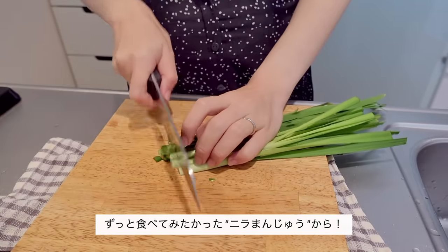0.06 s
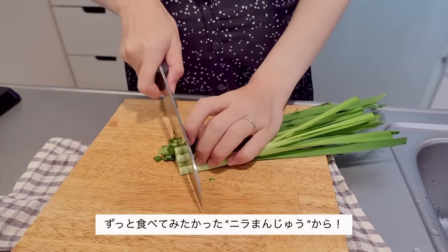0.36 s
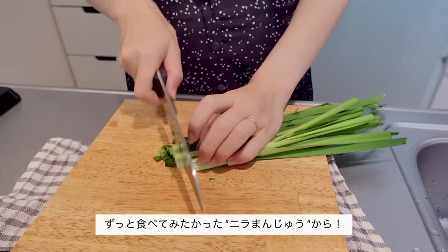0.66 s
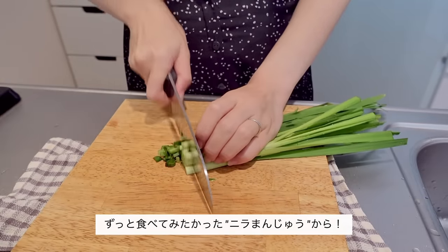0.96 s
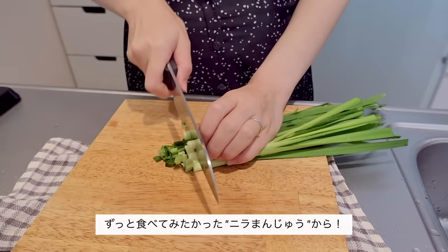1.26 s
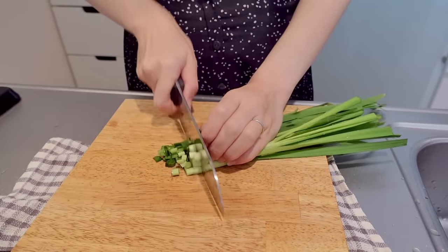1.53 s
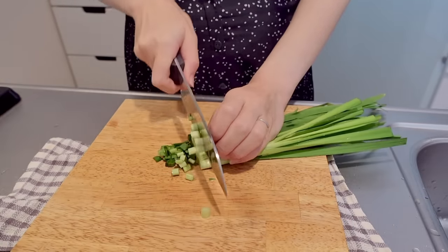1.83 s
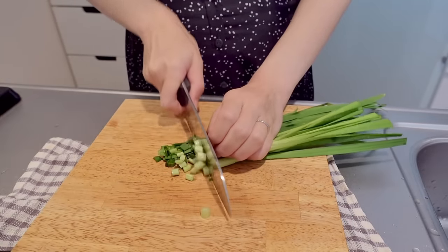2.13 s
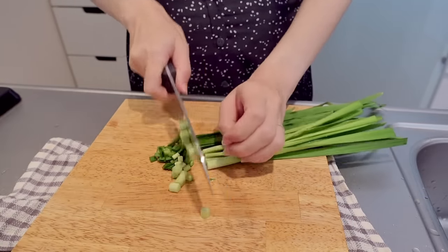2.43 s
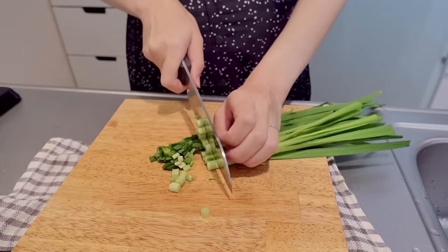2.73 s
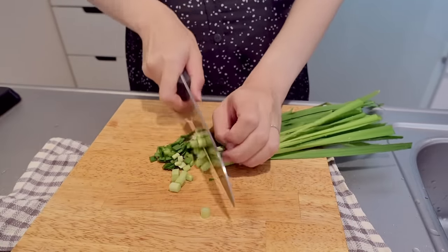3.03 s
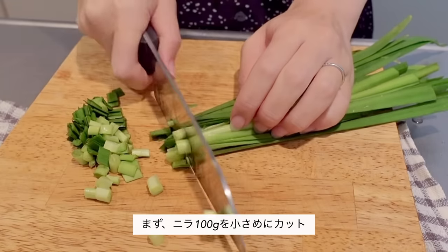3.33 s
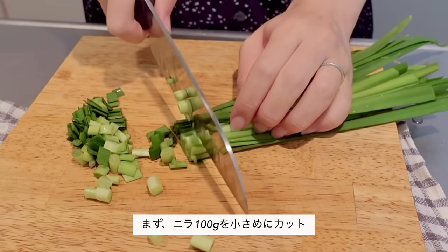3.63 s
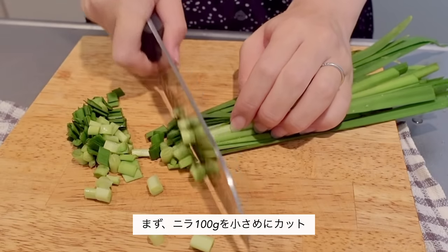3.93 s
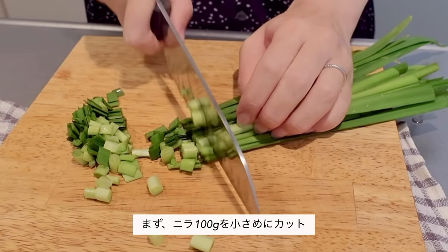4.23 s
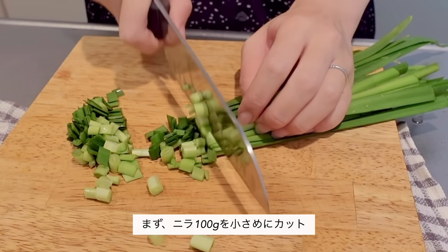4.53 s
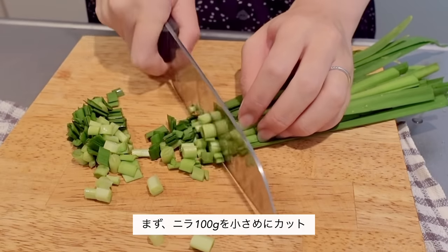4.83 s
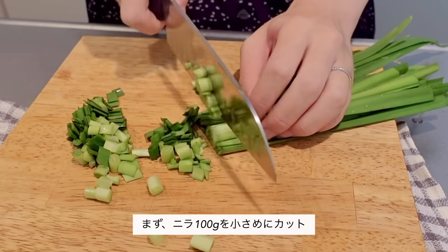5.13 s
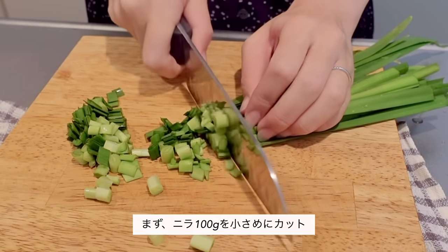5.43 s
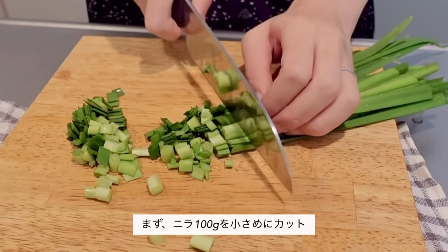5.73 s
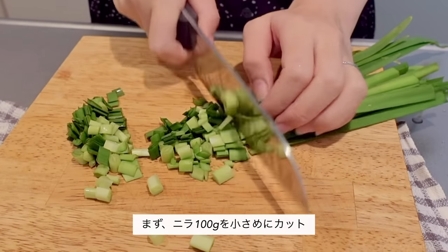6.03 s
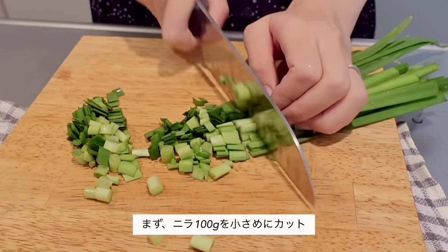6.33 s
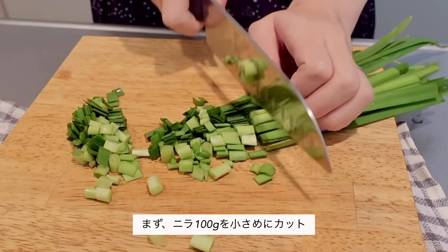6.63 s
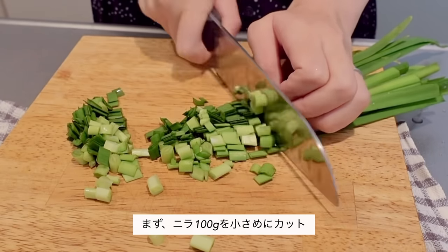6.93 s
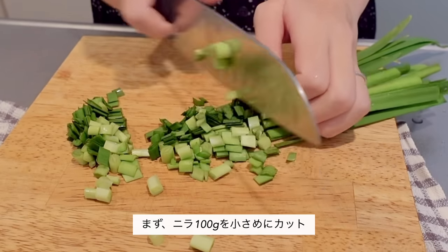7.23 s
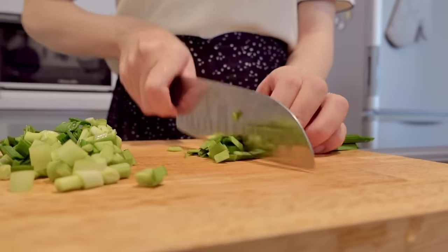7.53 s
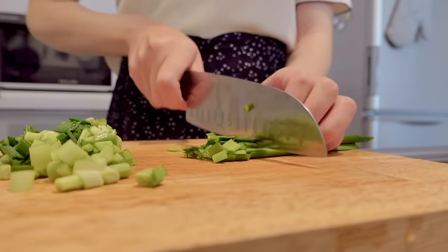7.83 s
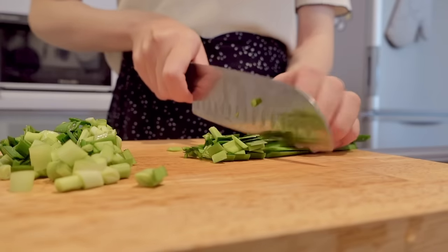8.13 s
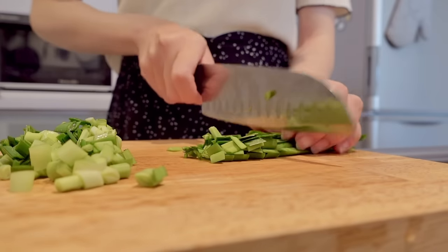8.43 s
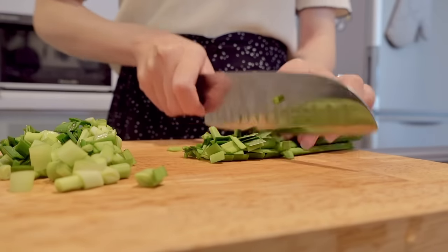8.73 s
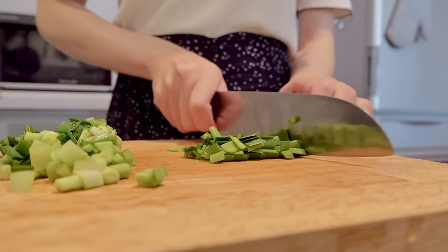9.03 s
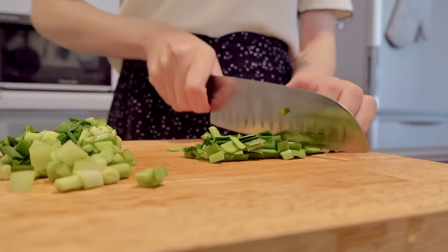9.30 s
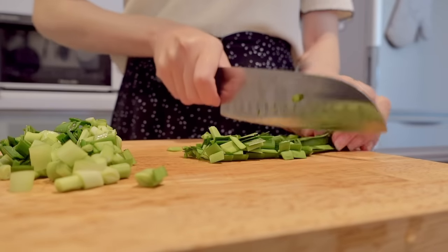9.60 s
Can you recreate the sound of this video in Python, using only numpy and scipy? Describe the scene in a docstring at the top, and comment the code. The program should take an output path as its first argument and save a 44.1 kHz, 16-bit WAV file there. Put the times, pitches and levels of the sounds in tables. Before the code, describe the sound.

A kitchen knife chops chives on a wooden board in steady strokes, each a crisp crunch ending in a knock.

```python
"""A crisp crunch swells and ends in a knock on wood: a knife chopping garlic chives on a board.
Each stroke touches the leaves, bursts cells and fibres with growing force, strikes the board and rubs
back up past the bunch. Once, the bare edge clacks down and sweeps the pieces aside.
The place is a small, quiet kitchen with a faint appliance hum. The microphone first looks down on the
board; for the last, quicker strokes it stands low beside it."""
import sys
import numpy as np
from scipy import signal
from scipy.fft import rfft, irfft
from scipy.io import wavfile
from scipy.ndimage import uniform_filter1d

SR = 44100
rng = np.random.default_rng(int(sys.argv[2]) if len(sys.argv) > 2 else 0)


def bounce(signal):
    """Save signal as a 16-bit WAV file at the path given by the first command-line argument."""
    frames = np.transpose(np.atleast_2d(signal))
    limited = np.clip(frames, -1, 1)
    pcm = np.round(limited * 32767).astype(np.int16)
    wavfile.write(sys.argv[1], SR, pcm)


N = 426006

MIC_MOVE_S, TAP_S = 7.335, 3.2235  # the microphone goes from above to beside; the bare edge is set down
HARD_PITCH_RATIO = 1.4  # a hard contact lifts the parts above this multiple of the knock's pitch

# Knife strokes at the board; levels in the tables are relative. (landing time [s], knock level [dB],
# knock pitch [Hz], hardness [dB], cut length [s], final crunch level [dB], slide decay [s],
# touch time [s], touch level [dB], rub level [dB], rub length [s])
STROKES = [ (0.4447, -2, 813, 2, 0.073, -18, 0.027, .247, -44, -55, .13),
           (1.0004, 0, 740, -13, 0.11, -17, 0.014, .812, -46, -62.5, 0.14),
           (1.5360, 3, 782, -4, 0.11, -17.5, 0.0011, 1.356, -38.5, -54, .3),
           (2.1221, 1.5, 789, -0.5, 0.079, -15.5, 0.015, 1.938, -36, -50.5, .26),
           (2.8349, 3.5, 766, -6.5, 0.11, -16, 0.0035, 2.626, -44.5, -59.5, 0.26),
           (3.781, -2.5, 790, -1, 0.11, -15, 0.019, 3.618, -30, -61.5, 0.33),
           (4.2902, -1, 773, 4, 0.11, -16, 0.02, 4.143, -34.5, -43, 0.24),
           (4.8050, 2.5, 760, -7, .12, -15.5, 0.0018, 4.664, -36.5, -46, 0.28),
           (5.3204, 3.5, 762, -9.5, 0.07, -14.5, 0.0013, 5.211, -34.5, -44.5, .18),
           (5.831, 4, 780, -5.5, .1, -14.5, .001, 5.6895, -34, -51.5, 0.28),
           (6.3750, 3.5, 780, -6.5, 0.12, -14, 0.0061, 6.26, -31.5, -52.5, 0.16),
           (6.9218, .5, 747, -7, 0.1, -15.5, 0.015, 6.775, -37.5, -51, 0.37),
           (7.5593, -2.5, 1120, 7, 0.056, -13.5, 0.016, 7.47, -40.5, -51, 0.076),
           (7.9058, 4.5, 1106, 6.5, 0.081, -13.5, .001, 7.794, -35, -46.5, 0.19),
           (8.2563, -4.5, 1020, 3, .058, -13.5, 0.026, 8.025, -39, -47.5, 0.14),
           (8.6096, 3, 1065, 3.5, 0.08, -14.5, 0.0037, 8.484, -39, -55, .2),
           (9.0104, 2, 1083, 5.5, 0.057, -14.5, 0.01, 8.93, -41, -55, .11),
           (9.371, 2, 1060, 5, 0.045, -13.5, .004, 9.29, -37, -60, 0.21)]
def chopping(beside, cells, ticks):
    """The strokes heard from one microphone position, beside the board or above it, as (leaves, wood)."""
    start, end = (MIC_MOVE_S, N / SR) if beside else (0, MIC_MOVE_S)
    strokes = [row for row in STROKES if start <= row[0] < end]
    force = pressing(strokes, swell_db_per_s=400 if beside else 289)
    rub = np.zeros(N)
    for time, *_, rub_db, rub_s in strokes:
        add(rub, time + .135, rubbing(rub_db, rub_s))  # the blade lifts just after the knock
    if start <= TAP_S < end:  # the pieces are shoved together, then the edge scrapes on
        add(force, TAP_S, squeeze(-25, .065, shape=3.7))
        add(rub, TAP_S + .085, rubbing(-46.5, .12))
    snaps, tears = tough_fibres(start, end)
    force += tears
    tearing = force * cells + rub * ticks + snaps
    tearing += thin_fibres(force, rate=70, db=-2, exponent=.69)
    tearing += thin_fibres(rub, rate=12, db=-11.5, exponent=.44)
    wood = blows(strokes, beside) + board(strokes, tearing, beside) + judder(tearing, beside)
    return crunch(tearing, beside), wood


def pressing(strokes, swell_db_per_s, slide_db=-3.5, restart_s=.0036):
    """Force on the leaves: a touch, a swell that collapses at the wood, a return as the edge slides on."""
    force, t = np.zeros(N), seconds(.15)
    restart = 1 - np.exp(-t / restart_s)
    for time, _, _, _, cut_s, crunch_db, slide_s, touch_time, touch_db, _, _ in strokes:
        touch_s = .015 * 2 ** ((-26.5 - touch_db) / 17)  # a touch 17 dB softer lasts twice as long
        add(force, touch_time, squeeze(touch_db, touch_s))
        depth_left = np.linspace(1, 0, len(seconds(cut_s)))
        add(force, time - cut_s, undb(crunch_db - swell_db_per_s * cut_s * depth_left ** 1.366))
        add(force, time, undb(crunch_db + slide_db) * restart * np.exp(-t / slide_s))
    return force


def squeeze(db, length, shape=2.0):
    """Leaves pressed together: a sudden start, then they give way."""
    return undb(db) * np.exp(-(seconds(3 * length) / length) ** shape)


# The edge on the wood, from above and from beside: (knock pitch multiple [x], level [dB], rise time [s])
BLOW_ABOVE = [(.29, -20.5, 0.0021), (0.681, -22.5, 0.0056), (1.001, -2, 0.001), (1.83, -8.5, 0.0018),
              (3.1, -23.5, 0.0013)]
BLOW_BESIDE = [(.33, -21, 0.0008), (1, -5, 0.00081), (1.68, -12.5, .0007), (2.9, -21, 0.00045)]
def blows(strokes, beside):
    """The edge lands: a few strong cycles, pitched by where it lands."""
    sound, t = np.zeros(N), seconds(.02)
    for time, db, pitch_hz, hard_db, *_ in strokes:
        for multiple, part_db, rise_s in BLOW_BESIDE if beside else BLOW_ABOVE:
            gain = undb(db + part_db + hard_db * (multiple > HARD_PITCH_RATIO))
            pulse = t / rise_s * np.exp(1 - t / rise_s)
            add(sound, time, -gain * pulse * np.sin(2 * np.pi * pitch_hz * multiple * t))
    return sound


# Modes of the board, from above and from beside: (frequency [Hz], level [dB], t60 [s])
BOARD_ABOVE = [(156.2, -38, 0.48), (195, -35.5, 0.18), (227, -37, 0.33), (469, -38.5, 0.33),
               (525.5, -19, 0.18), (575, -34.5, 0.2), (596.8, -24.5, 0.18), (676, -23, 0.11),
               (701.6, -30.5, 0.086), (774.5, -21.5, 0.06), (810, -23.5, 0.088), (936, -55, 0.44),
               (1127, -37, 0.33), (1426, -29, 0.082), (1450, -38, 0.25), (1473, -29, 0.23),
               (1536, -33, 0.24)]
BOARD_BESIDE = [(151, -47, 0.34), (219.3, -34, 0.29), (462, -24.5, 0.079), (540.5, -24, 0.075),
                (869.4, -24.5, 0.2), (903, -26, 0.11), (976, -44, 0.1), (1086, -7.5, 0.028),
                (1163, -46, 0.054), (1300, -26, 0.14), (1364, -20.5, 0.056), (1408, -16, 0.04),
                (1502, -34, 0.1), (1790, -50, 0.16), (1900, -58, .16), (2000, -56, 0.12),
                (2400, -29.5, 0.077), (2730, -36, 0.16)]
def board(strokes, tearing, beside, build_s=.0016, damping_s=.083):
    """The board rings after each knock, and the tearing leaves shake it through the blade."""
    modes, ring_db, shake_db = (BOARD_BESIDE, -4, -15.5) if beside else (BOARD_ABOVE, -1, -9)
    damped = ring(modes, .2) * np.exp(-seconds(.2) / damping_s)  # the pressing blade damps the wood
    sound = undb(shake_db) * through(tearing, damped / np.linalg.norm(damped))
    build = 1 - np.exp(-seconds(.4) / build_s)
    for time, db, pitch_hz, hard_db, *_ in strokes:
        struck = []
        for hz, mode_db, t60 in modes:
            # each landing spot and hand pressure favours other modes and detunes them a little
            detune, lift_db = rng.standard_normal(2) * [.008, 2.5]
            lift_db += hard_db / 2 * (hz > HARD_PITCH_RATIO * pitch_hz)
            struck.append((hz * (1 + detune), mode_db + lift_db, t60))
        add(sound, time, undb(db + ring_db) * build * ring(struck, .4))
    return sound


# Colour of the bursting cells, from above and from beside: (frequency [Hz], level [dB])
CRUNCH_ABOVE = [(100, -27), (400, -27.5), (1000, -4.5), (1500, 5.5), (2000, -1.5), (2500, -0.5), (3300, -5),
                (5000, -3), (7500, 1.5), (9500, -7.5), (13000, -9.5), (16000, -15)]
CRUNCH_BESIDE = [(40, -39), (100, -13.5), (400, -4.5), (700, -5), (1000, -4), (2100, 0), (3300, -9.5),
                 (5000, -2), (7000, -3), (9000, 0), (12000, 2.5), (14000, -4), (16000, -14)]
def crunch(tearing, beside):
    """The tearing leaves as they reach the microphone directly."""
    return through(tearing, colour(CRUNCH_BESIDE if beside else CRUNCH_ABOVE))


def cell_bursts(rate, spread_db, burst_s, fizz, tint_db):
    """Cells pop at random moments, each of its own size and brightness, over a fizz of tiny ones."""
    count, sound = int(rate * N / SR), 0
    moments = rng.integers(0, N, count)
    sizes_db = spread_db * np.minimum(rng.exponential(size=count), 3)
    edges_hz = np.geomspace(1000, 20000, num=5)
    edges_hz[0] = 0
    for low, high in zip(edges_hz, edges_hz[1:]):
        gains = undb(sizes_db + tint_db * rng.standard_normal(count))
        power = linger(np.bincount(moments, gains ** 2, N), burst_s)
        envelope = np.sqrt(fizz + (1 - fizz) * power / power.mean())
        sound += band(rng.standard_normal(N), low, high) * envelope
    return sound


def leaf_pops(rate, low_hz, high_hz, ring_s, spread_db=3):
    """Hollow leaves pop with a few cycles at their own pitch; rms 1."""
    count, t = int(rate * N / SR), seconds(.0082)
    when, pitch, size = rng.random((count, 3)).T[:, :, None]
    hz = low_hz * (high_hz / low_hz) ** pitch
    gains = undb(-spread_db * np.log(np.maximum(size, .05)))
    pops = gains * np.sin(2 * np.pi * hz * t) * np.exp(-t / ring_s)
    samples = (when * N).astype(int) + np.arange(len(t))
    sound = np.bincount(samples.ravel(), pops.ravel(), N)[:N]
    return sound / sound.std()


# The toughest fibres breaking at the board: (time [s], level [dB], pitch [Hz])
SNAPS = [(.35, -12, 4900), (.402, -6, 7400), (.4878, -7.5, 6840), (0.8322, -18, 6460), (.924, -7.5, 6700),
         (1.442, -13, 4290), (1.474, -6.5, 6300), (2.0545, -6.5, 5600), (2.729, -19.5, 7200),
         (2.755, -8, 7050), (2.791, -2, 7170), (2.989, -20, 5200), (3.1524, -26.5, 7650), (3.36, -21, 2650),
         (4.07, -27, 2400), (4.206, -13, 2970), (4.485, -25, 2250), (4.7725, -12, 6390),
         (5.021, -23.5, 2340), (5.211, -18.5, 6340), (5.7998, -4.5, 7800), (5.9906, -19, 3150),
         (6.2658, -9, 6330), (6.8892, -1, 2320), (7.448, -23, 5920), (7.875, -2, 10500), (8.094, -19, 1960),
         (8.2004, -15.5, 5700), (8.955, -10.5, 11900), (9.22, -23, 4500), (9.339, -12, 8660)]
def tough_fibres(start, end, snap_db=-7.5, tear_db=-23, tear_s=.0086):
    """Each tough fibre snaps and tears a few cells around it; gives (snaps, force on those cells)."""
    snaps, tears = np.zeros(N), np.zeros(N)
    for time, db, hz in SNAPS:
        if start <= time < end:
            add(snaps, time, undb(db + snap_db) * snap(hz))
            add(tears, time, squeeze(db + tear_db, tear_s))
    return snaps, tears


def thin_fibres(pressure, rate, db, exponent, spread_db=4, low_hz=2300, high_hz=10000):
    """Thin fibres snap at random, louder the harder the leaves are pressed."""
    sound, count = np.zeros(N), int(rate * N / SR)
    for when, pitch, size in rng.random((count, 3)):
        gain = undb(db + spread_db * (2 * size - 2.5)) * pressure[int(when * N)] ** exponent
        add(sound, when * N / SR, gain * snap(low_hz * (high_hz / low_hz) ** pitch))
    return sound


def snap(hz, decay_s=.00068):
    """A fibre breaks: a tiny crack with a hint of pitch."""
    t = seconds(.0034)
    return (rng.standard_normal(len(t)) + np.sin(2 * np.pi * hz * t)) * np.exp(-t / decay_s)


def judder(tearing, beside):
    """The blade judders in the bunch: a dull murmur under each cut."""
    murmur = colour([(60, -38.5), (130, -17.5), (200, -3.5), (250, -.5), (330, -38.5), (700, -50)], 4096)
    return undb(-19.5 if beside else -14.5) * through(tearing, murmur)


def rubbing(db, length, fade_db_per_s=26):
    """Pressure of the blade rubbing along the leaves, ever more lightly."""
    t = seconds(length)
    return undb(db - fade_db_per_s * t) * signal.windows.tukey(len(t), .18)


def slips(rate, slip_s, spread_db, uneven=.38):
    """The wet blade sticks and slips in a loose rhythm, one dry tick a slip; rms 1."""
    gaps, sizes = rng.standard_normal((int(rate * N / SR), 2)).T
    elapsed = np.cumsum(np.exp(uneven * gaps))
    moments = (elapsed / elapsed[-1] * (N - 1)).astype(int)
    power = linger(np.bincount(moments, undb(spread_db * sizes) ** 2, N), slip_s)
    return rng.standard_normal(N) * np.sqrt(power / power.mean())


# Steel on bare wood, heard from above: (frequency [Hz], level [dB], t60 [s])
TAP_MODES = [(75, -36.5, 0.33), (213, -24.5, 0.081), (380, -15.5, 0.034), (730, -15, 0.033),
             (990, -14.5, 0.013), (1350, -4.5, 0.016), (1490, -17, 0.024), (1810, -17, 0.022),
             (2320, -14.5, 0.025)]
def tap(db=4, build_s=.00085):
    """The edge is set down once with a dry clack, to sweep the pieces aside."""
    sound = np.zeros(N)
    build = 1 - np.exp(-seconds(.3) / build_s)
    add(sound, TAP_S, undb(db) * build * ring(TAP_MODES, .3))
    return sound


# The hand leaning on the board: (time [s], level [dB])
LEANS = [(1.362, -44.5), (6.997, -36), (7.061, -37.5)]
# Modes of the counter under the board: (frequency [Hz], level [dB], t60 [s])
COUNTER_MODES = [(21.55, 6, 0.97), (47.4, -8, 0.44), (69.7, 0, 1), (88, -23, 0.14), (133, -7, 0.52)]
def counter(knock_push_db=-49, touch_push_db=-15):
    """Strokes and the leaning hand rock the counter, which rumbles at the overhead microphone."""
    pushes = np.zeros(N)
    for time, db in LEANS:
        add(pushes, time, undb([db]))
    for time, db, *_, touch_time, touch_db, _, _ in STROKES:
        if time < MIC_MOVE_S:
            add(pushes, touch_time, undb([touch_db + touch_push_db]))
            add(pushes, time, undb([db + knock_push_db]))
    return through(pushes, ring(COUNTER_MODES, 1))


def cupboards(direct, tail_db, echo_s, echo_db, t60, gap_s=.0023):
    """The knock reaches the microphone directly, then off a nearby surface and as a short diffuse tail."""
    t = seconds(.5)
    response = rng.standard_normal(len(t)) * np.exp(-np.log(1000) * t / t60) * (t > gap_s)
    response *= undb(tail_db) / np.linalg.norm(response)
    response[int(echo_s * SR)] += undb(echo_db)
    return direct + through(direct, response)


def walls(direct, tail_db, t60=.48, treble_loss=.46):
    """The crunch comes back from the kitchen walls as a smooth wash; its top dies first."""
    edges_hz, tail = [400, 1700, 4000, 6500, 9000, 16000], 0
    for low, high in zip(edges_hz, edges_hz[1:]):
        noise = band(rng.standard_normal(N), low, high)
        decay_s = t60 / np.log(1000) / (1 + treble_loss * low / 9000)
        power = linger(band(direct, low, high) ** 2, decay_s)
        tail += noise / noise.std() * np.sqrt(power)
    return direct + undb(tail_db) * tail


# Room tone above the board and beside it: (frequency [Hz], level [dB])
ROOM_ABOVE = [(25, 6), (55, 2.5), (120, -6.5), (270, -2.5), (520, -11), (660, -8), (900, -12),
              (1500, -14.5), (2000, -19.5), (3000, -25), (7000, -24), (10000, -29.5), (16000, -39.5)]
ROOM_BESIDE = [(25, -12), (70, -3.5), (200, 0.5), (300, -3), (450, 1.5), (700, -1.5), (1200, -5.5),
               (1700, -15), (2400, -11), (3200, -20), (6000, -25), (11000, -18.5), (16000, -41)]
def room_tone(beside, db=-50.5):
    """Soft, steady kitchen noise around the microphone."""
    response = colour(ROOM_BESIDE if beside else ROOM_ABOVE, size=4096)
    return undb(db) * through(rng.standard_normal(N), response)


# A faint background hum, tone by tone: (frequency [Hz], level [dB], time it falls silent [s])
HUM_TONES = [(659, -64, 3.25), (659, -72, 7.335), (1570, -66.5, 6.4)]
def appliance_hum(waver_rad=.3, fade_s=.016):
    """Faint, slightly unsteady tones that drop in level or fall silent at set moments."""
    t, sound = np.arange(N) / SR, 0
    drift = waver_rad * wander(rate=11)
    for hz, db, stop in HUM_TONES:
        running = np.clip((stop - t) / fade_s, 0, 1)
        sound += np.sqrt(2) * undb(db) * np.sin(2 * np.pi * hz * t + drift) * running
    return sound


def undb(db):
    """Decibels to gain."""
    return 10 ** (np.asarray(db) / 20)


def seconds(length):
    """Time axis of the given length."""
    return np.arange(max(int(length * SR), 8)) / SR


def add(track, start, sound):
    """Mix a sound into a track at a time."""
    i = int(np.clip(start * SR, 0, N - 1))
    track[i:i + len(sound)] += sound[:N - i]


def through(x, response):
    """Pass a sound through an impulse response."""
    return signal.oaconvolve(x, response)[:N]


def colour(points, size=1024):
    """Causal response of unit energy with the outline (frequency [Hz], level [dB])."""
    hz, db = np.transpose(points)
    bins_hz = np.arange(size // 2 + 1) * SR / size + 1
    outline_db = np.interp(np.log(bins_hz), np.log(hz), db)
    cepstrum = irfft(np.log(undb(outline_db)))
    cepstrum[1:size // 2] *= 2  # fold to minimum phase
    cepstrum[size // 2 + 1:] = 0
    response = irfft(np.exp(rfft(cepstrum)))
    return response / np.linalg.norm(response)


def ring(modes, length):
    """Decaying sines of a struck body."""
    t = seconds(length)
    return sum(undb(db) * np.sin(2 * np.pi * hz * t) * np.exp(-np.log(1000) * t / t60)
               for hz, db, t60 in modes)


def wander(rate):
    """Smooth random drift of spread 1."""
    hold = int(SR / rate)
    steps = np.repeat(rng.standard_normal(N // hold + 1), hold)
    drift = uniform_filter1d(steps, hold)[:N]
    return drift / drift.std()


def band(x, low_hz, high_hz):
    """Band-pass filter."""
    edges_hz = np.clip([low_hz, high_hz], 10, .48 * SR)
    return signal.sosfilt(signal.butter(2, edges_hz, "band", fs=SR, output="sos"), x)


def linger(power, decay_s):
    """Let power die away exponentially, keeping its total."""
    keep = np.exp(-2 / (decay_s * SR))
    return signal.lfilter([1 - keep], [1, -keep], power + 1e-18)


def scene():
    """One microphone in the kitchen: above the board, then low beside it."""
    cells = .8 * cell_bursts(rate=800, spread_db=2.7, burst_s=.0006, fizz=.2, tint_db=3)
    cells += .6 * leaf_pops(rate=1500, low_hz=2500, high_hz=15000, ring_s=.0011, spread_db=2.5)
    ticks = slips(rate=65, slip_s=.0017, spread_db=4)
    ticks += .45 * leaf_pops(rate=600, low_hz=1700, high_hz=5000, ring_s=.0006)
    leaves_above, wood_above = chopping(beside=False, cells=cells, ticks=ticks)
    leaves_beside, wood_beside = chopping(beside=True, cells=cells, ticks=ticks)
    sound = walls(leaves_above + leaves_beside, tail_db=-14)
    sound += cupboards(wood_above + tap(), tail_db=-10.5, echo_s=.011, echo_db=-16.5, t60=.35)
    sound += cupboards(wood_beside, tail_db=-8.5, echo_s=.0046, echo_db=-39, t60=.21)
    overhead = np.clip((MIC_MOVE_S - np.arange(N) / SR) / .02, 0, 1)
    sound += overhead * (counter() + room_tone(beside=False))
    sound += (1 - overhead) * room_tone(beside=True)
    return (sound + appliance_hum())[None]


def record(dry):
    """The recorder flattens the tops of the hardest knocks and cuts the highest treble."""
    top_hz, ceiling = 16000, .82
    low_pass = signal.ellip(10, .2, 70, top_hz, fs=SR, output="sos")
    sound = signal.sosfilt(low_pass, dry)
    rounded = sound / (1 + (sound / ceiling) ** 8) ** (1 / 8)
    return signal.sosfilt(low_pass, rounded)


dry = scene()
out = record(dry)
bounce(out)
```